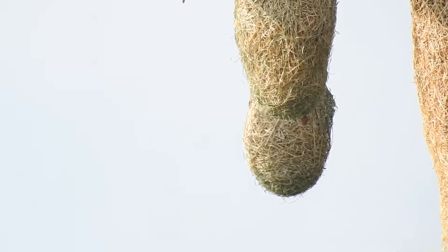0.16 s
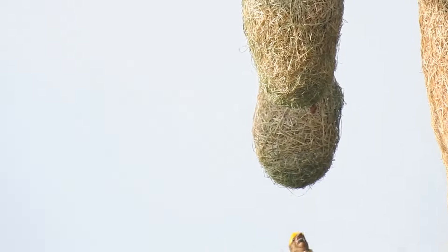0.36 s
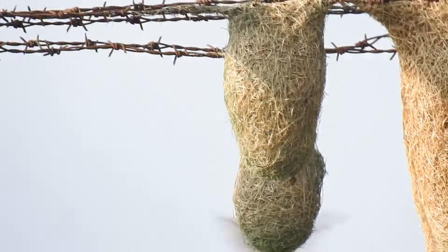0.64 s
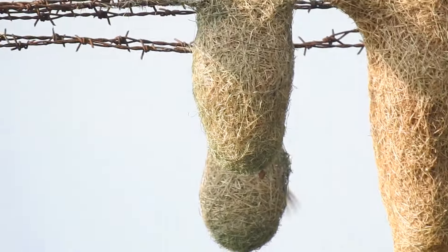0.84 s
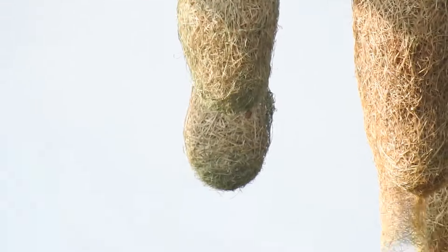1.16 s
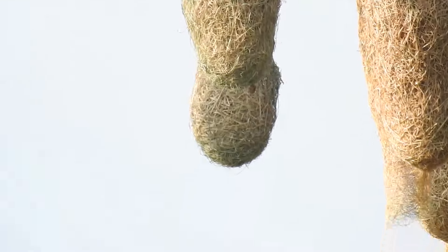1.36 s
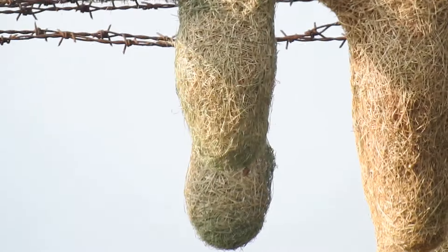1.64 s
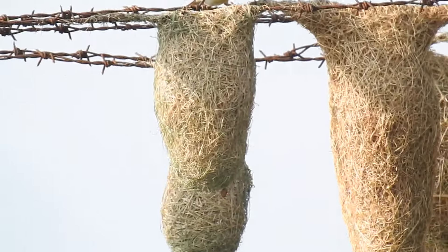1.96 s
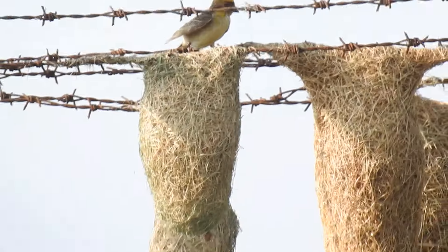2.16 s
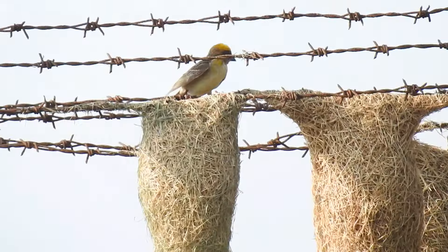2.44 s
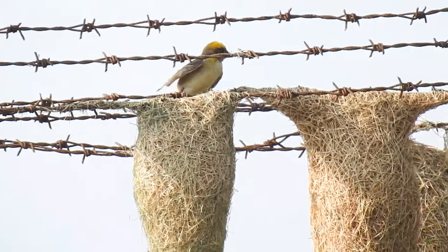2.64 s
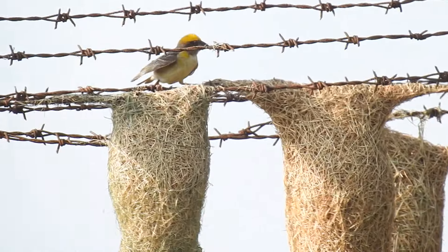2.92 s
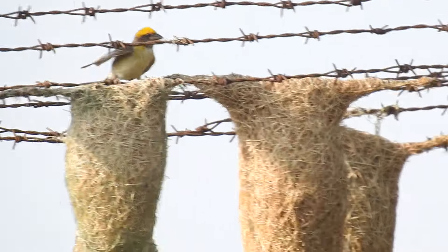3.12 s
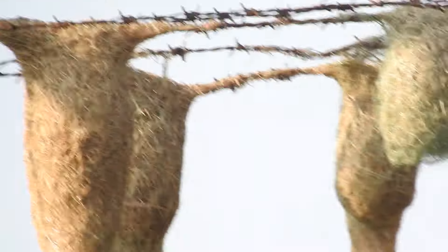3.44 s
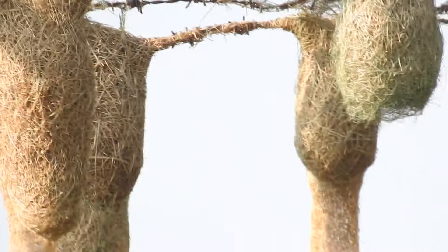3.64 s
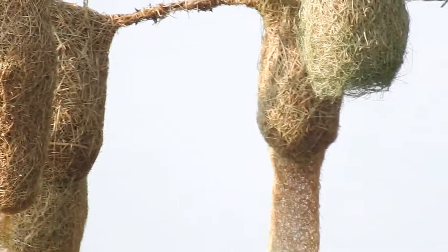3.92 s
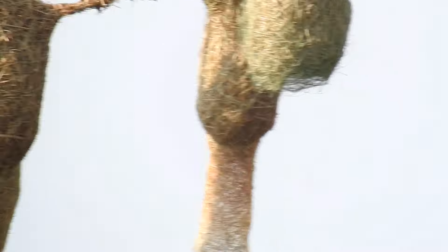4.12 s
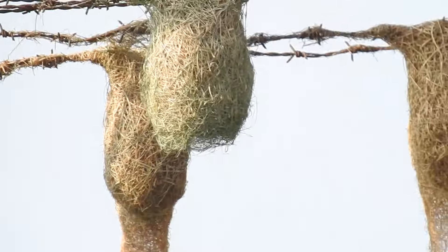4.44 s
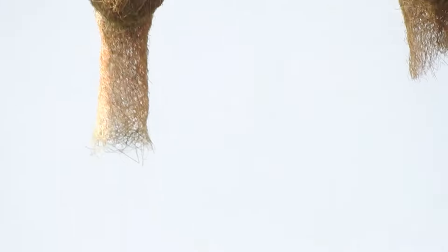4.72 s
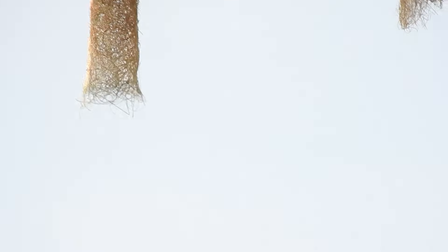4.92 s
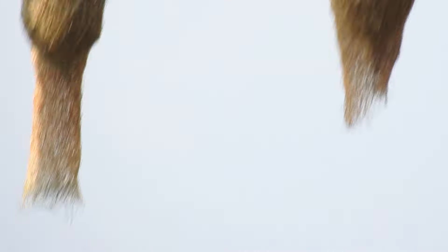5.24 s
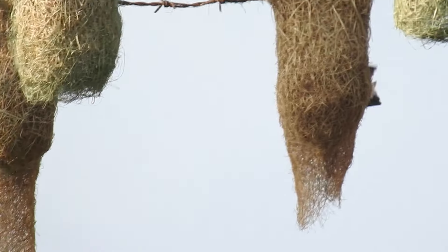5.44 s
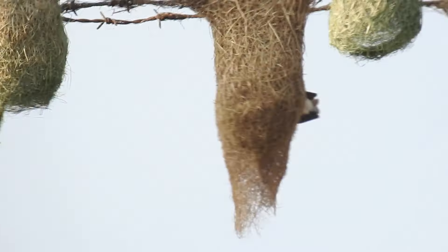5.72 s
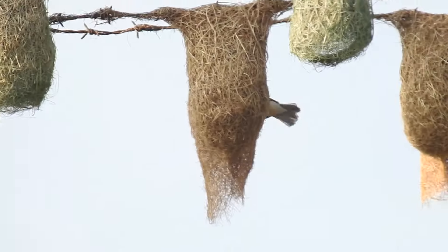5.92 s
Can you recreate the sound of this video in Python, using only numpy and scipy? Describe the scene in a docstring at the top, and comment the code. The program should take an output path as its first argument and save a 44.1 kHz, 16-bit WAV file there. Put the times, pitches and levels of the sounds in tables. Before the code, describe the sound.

Many small birds twitter in open air, near ones sharp and distant ones a shimmering bed. Rapid chattering syllables come about seven a second, with squeaks and piping between them, then louder sliding whistles and a hoarse drawn-out buzz. Low wind buffets knock separately on left and right of the camera's microphone, clustering late. A distant engine hums faintly; a tiny motor whirrs in the last half second.

```python
"""Weaver birds at their hanging nests

A colony in open country, heard through a camera's two microphone ports. Near birds whistle, squeak, rattle
and draw out a long buzzing wheeze, built from hoarse tones, over a far chorus of noise bands and short glides.
A distant engine throbs as ringing pulses. Wind eddies thump on one port or the other as brief pressure swings.
Near the end a small lens motor starts to whirr, made of tones and bands of noise."""
import sys
import numpy as np
from scipy import signal
from scipy.io import wavfile
from scipy.ndimage import uniform_filter1d

SR = 44100
rng = np.random.default_rng(int(sys.argv[2]) if len(sys.argv) > 2 else 0)


def persist_wave(psi):
    """Save psi, clipped to +-1, as 16-bit WAV."""
    counts = np.round(np.clip(psi, -1, 1) * 32767).astype(np.int16)
    wavfile.write(sys.argv[1], SR, np.atleast_2d(counts).T)


N = 268083

# loudness of the far birds over time, before each layer's own offset: time_s, level_db
CHORUS_LEVEL = [(0.0, -45), (0.59, -41.5), (1.24, -44.5), (3.93, -45), (4.98, -46), (6.08, -43.5)]
# how the far birds' sound is spread over pitch, relative: pitch_hz, level_db (per Hz)
CHORUS_SPECTRUM = [(1000, -20), (1700, -9.5), (2250, 1), (2710, -0.5), (3460, 2), (3960, 3), (4630, 6.5),
                   (5610, 3), (6850, 6), (10000, -45), (13000, -34), (22000, -120)]


def amp(db):
    """Turn decibels into a multiplying gain."""
    return 10 ** (np.asarray(db) / 20)


def rms_one(x):
    """Scale a sound to an rms (average strength) of 1."""
    return x / np.sqrt(np.mean(x ** 2) + 1e-20)


def in_time(rows):
    """Read each column of a time table at every sample, with straight lines between rows."""
    time_s, *columns = np.transpose(rows)
    return [np.interp(np.arange(N) / SR, time_s, column) for column in columns]


def at_hz(points, hz):
    """Read a spectrum table at a frequency, on a log-frequency axis."""
    table_hz, values = np.array(points).T
    return np.interp(np.log(hz), np.log(table_hz), values)


def drift(rate_hz, size=N):
    """Random wandering of rms 1: noise passed twice through a one-pole low-pass."""
    r = np.exp(-2 * np.pi * rate_hz / SR)
    noise = rng.standard_normal(size + 4000)
    return rms_one(signal.lfilter([1], [1, -2 * r, r * r], noise)[4000:])  # drop the filter's start-up


def band(x, low_hz, high_hz):
    """Keep mainly the frequencies between two limits, with a Butterworth band-pass."""
    return signal.sosfilt(signal.butter(2, [low_hz, high_hz], "band", fs=SR, output="sos"), x)


def add(out, sound, start_s, edge_s):
    """Mix in one call with soft edges, at random a little louder on one side."""
    i = int(np.clip(start_s * SR, 0, N - 1))
    t = np.arange(len(sound)) / SR
    to_nearest_end = np.minimum(t, t[::-1])
    soft = np.sin(np.pi / 2 * np.clip(to_nearest_end / edge_s, 0, 1)) ** 2
    sides = amp(rng.normal(-0.6, 1) * np.array([[.5], [-.5]]))
    out[:, i:i + len(sound)] += (sound * soft * sides)[:, :N - i]


def span(rows, edge_s):
    """Read one call's table sample by sample, held on for half an edge at both ends."""
    time_s, *columns = np.transpose(rows)
    t = np.arange(max(time_s[0] - edge_s / 2, 0), time_s[-1] + edge_s / 2, 1 / SR)
    return t[0], [np.interp(t, time_s, column) for column in columns]


def hoarse(phase, share, spread_hz):
    """A tone of which a share of the power is smeared into noise around it."""
    size = len(phase)
    smear = drift(spread_hz, size=size) * np.sin(phase) + drift(spread_hz, size=size) * np.cos(phase)
    return np.sqrt(1 - share) * np.sin(phase) + np.sqrt(share / 2) * smear


def whistle(hz, level_db, flutter_db, husk, octave_db):
    """A husky, fluttering near sine from the syrinx (voice organ); its octave is strongest near 4300 Hz."""
    size = len(hz)
    phase = 2 * np.pi * np.cumsum(hz * (1 + 0.0061 * drift(142, size=size))) / SR
    share = np.clip(husk * hz / 4000, 0, .8)  # higher notes are huskier
    octave = amp(octave_db - np.abs(hz - 4300) / 100) * np.sin(2 * phase)
    return amp(level_db + flutter_db * drift(46, size=size)) * (hoarse(phase, share, 310) + octave)


def rattle(hz, level_db, per_s, hoarse_hz):
    """A run of chips that each fall in pitch; a higher voice is hoarser."""
    count = np.cumsum(per_s * amp(1.0 * drift(40, size=len(hz)))) / SR + rng.random()
    chip, within = count.astype(int), count % 1  # which chip, and how far through it
    strength, offset = rng.normal(0, 1, (2, chip.max() + 1))
    rough = np.clip((hz - hoarse_hz) / 3000, .45, .75)
    fall = .25 * (1.3 - rough) * (.5 - within)
    phase = 2 * np.pi * np.cumsum(hz * (1 + fall + .03 * offset[chip])) / SR
    gate = np.sin(np.pi * within) ** 2 + .08 + .7 * rough ** 2  # rough voices keep sounding between chips
    return amp(level_db) * rms_one(hoarse(phase, rough, 520) * gate * amp(1.8 * strength[chip]))


def add_rattle(out, begin_s, end_s, centre_hz, level_db, fade_db):
    """Two voices of the syrinx rattle together, the second higher, faster and weaker."""
    rows = [(begin_s, centre_hz, level_db + fade_db / 2), (end_s, centre_hz, level_db - fade_db / 2)]
    start, (hz, db) = span(rows, .016)
    add(out, rattle(hz, db, per_s=78, hoarse_hz=2480), start, .016)
    add(out, rattle(1.17 * hz, db - 4.0, per_s=86, hoarse_hz=2920), start, .016)


def add_whistle(out, rows):
    """One whistled note follows its table of time, pitch and level."""
    start, (hz, db) = span(rows, 0.015)
    add(out, whistle(hz, db - 1.5, flutter_db=2.5, husk=.14, octave_db=-28), start, .008)


def banded_noise(spectrum, patchy_db, patch_hz):
    """Stereo noise in third-octave bands, each with its own level, flicker and left-right likeness; rms 1."""
    # how alike the two ports sound, 1 meaning the same: pitch_hz, likeness (0 to 1)
    likeness = [(300, 1), (600, 0.97), (2500, 0.72), (5000, 0.43), (8000, 0.017), (12000, .05)]
    low_end, high_end = spectrum[0][0], spectrum[-1][0]
    edges = np.geomspace(low_end, high_end, round(3 * np.log2(high_end / low_end)))
    white = rng.standard_normal((2, 2, N))
    out = 0
    for k, (low, high) in enumerate(zip(edges, edges[1:])):
        mid, side = band(white[k % 2], low, high)
        hz = np.sqrt(low * high)
        alike = np.clip(at_hz(likeness, hz), 0, 1)
        # far sources flicker, the hiss of each port does not
        gain = amp(at_hz(spectrum, hz) + patchy_db * alike * drift(patch_hz))
        out = out + gain * (np.sqrt(1 + alike) * mid + np.sqrt(1 - alike) * side * [[1], [-1]])
    return rms_one(out)


def open_air():
    """Quiet background air: noise that flickers slowly in each band."""
    # spread of the air sound over pitch, relative: pitch_hz, level_db (per Hz)
    air_spectrum = [(200, 3), (300, 0.5), (600, 1), (800, -7.5), (1050, -2), (1700, -13), (4000, -23),
                    (9000, -36.5), (12000, -25.5), (16000, -39)]
    return amp(-47.5) * banded_noise(air_spectrum, patchy_db=3.2, patch_hz=8)


def engine():
    """Firing pulses of a far engine ring in its exhaust pipe, with some flow noise."""
    fires_per_s, pipe_hz = 28.8, 474.5
    turns = np.cumsum(fires_per_s * (1 + .012 * drift(2.5))) / SR
    fires = np.diff(np.floor(turns), prepend=0)  # 1 at each firing, else 0
    puffs = fires * amp(2.0 * rng.standard_normal(N)) + .01 * rng.standard_normal((2, N))
    return amp(-50.5) * rms_one(band(puffs, pipe_hz - 60, pipe_hz + 60))


def chorus_blur():
    """Far birds too many to tell apart: flickering noise shaped like their voices."""
    return amp(in_time(CHORUS_LEVEL)[0]) * banded_noise(CHORUS_SPECTRUM, patchy_db=6.0, patch_hz=30)


def far_notes():
    """Short glides of many distant birds, at random times and pitches."""
    notes_per_s = 160
    out = np.zeros((2, N))
    for when, pitch, length, slope, size in rng.random((round(notes_per_s * N / SR), 5)):
        hz, t = 2100 * 3.8 ** pitch, np.arange(0, 0.012 + 0.085 * length, 1 / SR)
        glide = hz * (1 + 0.16 * (slope - .6) * t / t[-1])
        # pitches are spread evenly in octaves, so higher notes must each carry more
        level_db = at_hz(CHORUS_SPECTRUM, hz) + 10 * np.log10(hz) + 7.0 * size
        note = whistle(glide, level_db, flutter_db=-2.5, husk=0.055, octave_db=-49)
        add(out, note, when * N / SR, t[-1] / 3)
    return amp(in_time(CHORUS_LEVEL)[0] - 8) * rms_one(out)


def wind():
    """Lumpy rumble, separate in each port, and eddies as a swing or two of pressure."""
    # rumble between thumps, before a 10 dB lift: time_s, level_db
    rumble_level = [(0.0, -45), (0.52, -43), (0.85, -47), (4.42, -46), (5.43, -36), (6.08, -47.5)]
    # spread of the rumble over pitch, relative: pitch_hz, level_db (per Hz)
    rumble_spectrum = [(12, -53), (20, -59), (40, 3.5), (70, 3.5), (146, 5.5), (219, -17), (330, -28.5),
                       (420, -11), (550, -41), (920, -120)]
    # eddies thumping on a port: time_s, swell_db, width_ms (at half height), port (0 left, 1 right)
    eddies = [(.375, -15.5, 8.6, 1), (.442, -8.5, 8.5, 1), (0.458, -7, 13, 0), (0.482, -7.5, 5.7, 1),
              (.501, -9, 6.5, 0), (.54, -14.5, 9.4, 1), (0.823, -15, 14, 0), (2.469, -16, 5.8, 0),
              (2.677, -2, 11, 1), (2.687, -4.5, 6.4, 0), (2.752, -16, 16, 0), (3.067, -17.5, 12, 0),
              (3.178, -15, 10.5, 0), (3.215, -16.5, 18, 0), (3.456, -7.5, 5.6, 1), (3.464, -2.5, 6.7, 0),
              (3.496, -12, 10, 0), (4.397, -15.5, 16, 0), (4.63, -10, 7.4, 1), (4.65, -12.5, 28, 0),
              (4.728, -9.5, 15.4, 1), (4.961, -11.5, 15.7, 1), (4.985, -17, 5.8, 1), (5.012, -14.5, 20, 1),
              (5.147, -8.5, 20, 1), (5.167, -11, 13, 1), (5.223, -6.5, 12, 1), (5.236, -7.5, 16.5, 0),
              (5.301, -15, 15.6, 0), (5.347, -6, 10.3, 0), (5.381, -8.5, 21, 1), (5.407, -6.5, 7, 1),
              (5.445, -13, 7, 1), (5.468, -14, 9.5, 1), (5.549, -14, 18, 1), (5.667, -6.5, 6.3, 0),
              (5.682, -13, 24, 1), (5.706, -10.5, 6.8, 0), (5.741, -10, 20, 1), (5.762, -4, 16, 0),
              (5.784, -11, 18, 0), (5.84, -8.5, 16, 1), (5.862, -3.5, 17.7, 0), (5.946, -16, 19.5, 1)]
    edges = np.geomspace(20, 420, 9)
    rumble = 0
    for low, high in zip(edges, edges[1:]):
        gain = amp(at_hz(rumble_spectrum, np.sqrt(low * high)))
        rumble = rumble + gain * band(rng.standard_normal((2, N)), low, high)
    lumps = amp([3.7 * drift(4.4), 2.25 * drift(9.3)])
    out = amp(in_time(rumble_level)[0] + 10.0) * rms_one(rumble * lumps)

    t = np.arange(-.05, .05, 1 / SR)
    noise_burst = rms_one(band(rng.standard_normal(len(t)), 400, 1600)) * .5 ** ((t / 0.0033) ** 2)
    for (time_s, swell_db, width_ms, port), turn in zip(eddies, rng.normal(0, 1, len(eddies))):
        hz = 143.7 + 1.87 * swell_db - 1.75 * width_ms  # strong and narrow eddies swing faster
        phase = 2 * np.pi * hz * t + turn * (1 - amp(swell_db))
        steep = .5 * amp(swell_db)  # strong eddies rise steeply and fall slowly
        swell = amp(swell_db) * .5 ** ((2000 * t / width_ms) ** 2)
        swing = swell * np.sin(phase + steep * np.sin(phase))
        i = round(time_s * SR) - len(t) // 2
        # at the strongest thumps the overloaded input also gives a short noise burst
        overload_burst = amp(-24.5 + 3.7 * swell_db) * noise_burst
        out[round(port), i:i + len(t)] += swing - swing.mean() + overload_burst
    return out


def motor():
    """A lens motor: whine, throbbing gear noise and a high whirr pulsed by the shaft."""
    # course of the motor: time_s, tone_hz, tone_db, gear_noise_db, whirr_db
    course = [(5.62, 1130, -61, -65, -82), (5.65, 1102, -43, -53, -66), (5.72, 1064, -58, -41, -58),
              (5.85, 1045, -44, -48.5, -61), (5.862, 951, -48.5, -48.5, -60), (6.08, 929, -44.5, -47, -60)]
    # gear tones heard once the motor has settled to its low speed: pitch_hz, level_db
    gear_tones = [(1205, -54), (2540, -58)]
    hz, tone_db, gear_db, whirr_db = in_time(course)
    t = np.arange(N) / SR
    phase = 2 * np.pi * np.cumsum(hz) / SR
    tone = amp(tone_db + 3.4 * drift(32)) * np.sqrt(2) * hoarse(phase, 0.23, 30)
    mesh = sum(amp(db + 3.5 * drift(9.9)) * np.sin(2 * np.pi * gear_hz * t) for gear_hz, db in gear_tones)
    mesh *= hz < 1000
    gear_noise = rms_one(band(band(rng.standard_normal(N), 450, 1200), 448, 1230))
    gear = amp(gear_db + 2.0 * np.sin(2 * np.pi * 24 * t)) * gear_noise
    whirr_noise = rms_one(band(rng.standard_normal((2, N)), 9050, 9500))
    whirr = amp(whirr_db) * (1 + .5 * np.sin(2 * np.pi * 44 * t)) * whirr_noise
    return (tone + mesh + gear + whirr) * (t > course[0][0])


def echoes(x):
    """A few dull reflections off ground and nests, at slightly different times on each side."""
    # delay_s (varied at random on each side), level_db
    reflections = [(.011, -13), (.023, -15), (.041, -17), (.067, -20), (.098, -23)]
    dull = signal.lfilter([.6], [1, -.4], x.mean(0))
    out = np.zeros((2, N))
    for delay_s, db in reflections:
        for side in out:
            lag = int(delay_s * SR * rng.uniform(0.75, 1.2))
            side[lag:] += amp(db) * dull[:-lag]
    return out


def ticks():
    """Bill or wire ticks: single-sample clicks through a high band-pass."""
    # time_s, click_db (before a 2 dB cut and the band-pass)
    tick_times = [(0.7097, -14), (0.7391, -28), (2.1115, -25), (2.2307, -27), (2.7137, -11), (3.1417, -31),
                  (4.4859, -43), (4.5036, -23), (4.965, -25)]
    clicks = np.zeros(N) + 1e-18
    for time_s, db in tick_times:
        clicks[round(time_s * SR)] = amp(db - 2.0)
    return band(clicks, 5500, 9300)


def squeaks():
    """Nasal squeaks: hoarse harmonics of one low note, shaped by the throat."""
    # pitch of the low note through one squeak: share_of_length, pitch_hz
    squeak_pitch = [(0, 526.5), (.65, 588), (1, 566)]
    # how strongly the throat passes each pitch, relative: pitch_hz, level_db
    throat = [(2300, -15.5), (2900, -11.5), (3450, 0), (4050, -10), (4650, 1), (5300, -13), (6000, -33)]
    # start_s, length_s, level_db (rms)
    squeak_times = [(1.101, 0.045, -39.5), (1.299, 0.027, -38.5), (1.495, 0.05, -38), (1.679, 0.048, -36),
                    (1.905, 0.0486, -39), (2.135, 0.039, -37.5), (2.435, 0.037, -37)]
    out = np.zeros((2, N))
    for start_s, length_s, level_db in squeak_times:
        start, (f0,) = span([(start_s + share * length_s, hz) for share, hz in squeak_pitch], 0.015)
        size = len(f0)
        phase = 2 * np.pi * np.cumsum(f0 * (1 + 0.0053 * drift(220, size=size))) / SR
        stack = 0
        for k in range(4, 11):
            gain = amp(at_hz(throat, k * f0) + 2.4 * drift(50, size=size))
            stack = stack + gain * hoarse(k * phase + k * k, 0.45, 180)
        add(out, amp(level_db) * rms_one(stack), start, .015)
    return out


def high_rattles():
    """Thin rattles of a higher bird, swelling slightly as they go."""
    # start_s, length_s, centre_hz, level_db (rms of the first voice)
    rattle_times = [(0.152, 0.089, 6080, -52), (0.302, 0.11, 6650, -51), (0.497, 0.059, 6450, -51),
                    (0.805, 0.11, 6400, -50), (1.694, 0.067, 6660, -48), (1.871, 0.067, 7000, -50),
                    (2.0, .1, 7160, -49), (2.099, 0.17, 7000, -51), (2.27, 0.12, 7560, -56),
                    (2.402, 0.13, 7260, -54), (0.624, 0.13, 7000, -56), (0.998, .1, 7340, -53.5),
                    (2.636, 0.031, 6430, -43)]
    out = np.zeros((2, N))
    for start_s, length_s, centre_hz, level_db in rattle_times:
        add_rattle(out, start_s, start_s + length_s, centre_hz, level_db, fade_db=-1.5)
    return out


def zigzag_calls():
    """Whistled calls whose pitch zigzags up and down with rounded turns."""
    # shape of one call: share_of_length, pitch_hz, level_db (relative)
    zigzag_shape = [(0, 5000, -8), (.15, 6400, -2), (.36, 5250, 0), (.52, 5200, 0), (.65, 6000, -2),
                    (.8, 5200, -3), (1, 4200, -6)]
    # start_s, length_s, level_db (added to the shape)
    zigzag_times = [(0.651, 0.082, -35), (1.613, 0.069, -30.5), (3.205, 0.094, -32.5), (3.944, 0.071, -33),
                    (4.755, .075, -30.5), (5.592, 0.079, -30.5)]
    out = np.zeros((2, N))
    for start_s, length_s, level_db in zigzag_times:
        rows = [(start_s + share * length_s, hz, db) for share, hz, db in zigzag_shape]
        start, (hz, db) = span(rows, 0.008)
        hz = uniform_filter1d(hz, size=150)  # rounds the turns
        call = whistle(hz, db + level_db, flutter_db=2.0, husk=.12, octave_db=-40)
        add(out, call, start, .006)
    return out


def whistled_notes():
    """Near-sine whistles: songs, straight chirps, two-voiced arches and a farther bird's low piping."""
    # song lines, one list each, before a 1.5 dB cut: time_s, pitch_hz, level_db
    songs = [
        [(1.34, 3250, -36), (1.37, 2384, -46), (1.418, 2110, -41)],
        [(1.428, 2750, -42), (1.45, 3240, -42), (1.5, 3250, -40.5)],
        [(1.565, 3070, -42), (1.61, 3090, -46.5), (1.645, 2280, -41), (1.667, 2270, -44)],
        [(4.37, 3570, -32.5), (4.4, 3270, -31), (4.436, 3240, -34)],
        [(4.79, 3010, -50), (5.0, 2970, -49.5), (5.15, 2890, -54)],
        [(4.14, 4650, -30.5), (4.26, 3970, -28), (4.32, 3820, -24.5)],
        [(4.375, 4350, -29), (4.45, 4170, -30.5), (4.6, 3660, -35), (4.675, 3070, -35)],
        [(4.548, 6410, -33), (4.62, 6410, -26), (4.66, 6060, -39)],
        [(4.68, 6420, -35), (4.82, 6350, -29.5), (4.9, 6240, -31), (5.05, 6440, -28), (5.2, 6200, -43)],
        [(4.62, 6010, -32), (4.7, 5620, -35), (4.78, 5600, -34)],
    ]
    # straight chirps, before the same cut: start_s, length_s, from_hz, to_hz, level_db
    chirps = [(0.964, 0.047, 6440, 6600, -37.5), (0.956, 0.083, 7120, 7000, -43),
              (1.112, 0.046, 7170, 7960, -44), (1.255, .045, 7540, 7000, -37),
              (1.383, 0.028, 7100, 7440, -45), (1.531, 0.081, 7250, 7150, -43),
              (1.657, .035, 7230, 7500, -42), (1.982, 0.022, 7760, 7770, -41),
              (2.067, .045, 5200, 5500, -45), (2.18, 0.024, 5200, 5050, -40),
              (2.353, 0.02, 3600, 3580, -33), (2.37, 0.019, 7930, 6420, -35),
              (2.45, 0.038, 5200, 5650, -39), (2.579, 0.046, 5280, 5630, -41),
              (2.952, .045, 4820, 5570, -42), (3.454, .045, 5240, 5150, -37),
              (4.373, 0.086, 2750, 2360, -51), (4.489, 0.027, 3200, 3090, -37.5),
              (4.562, 0.062, 6900, 6800, -34), (4.742, 0.02, 3035, 3085, -36),
              (5.502, .025, 3370, 2870, -38.5), (5.73, .02, 3090, 2900, -41),
              (5.782, 0.0165, 3610, 3830, -39.5), (5.922, .025, 3390, 3000, -38),
              (5.95, 0.016, 3570, 2880, -38), (5.974, .013, 3660, 3275, -41),
              (6.01, 0.0091, 3660, 3430, -42)]
    # faint level notes of a farther bird at 2250 Hz, before the same cut: start_s, level_db
    far_piping = [(.62, -49), (.8, -52), (.95, -48), (1.105, -55), (1.31, -49), (1.5, -53), (1.561, -53),
                  (1.72, -48), (1.81, -52)]
    # shape of one arched call: share_of_length, pitch_hz, level_db (relative)
    arch_shape = [(0, 5500, -18), (0.408, 6050, -4.5), (1.005, 5300, -19)]
    # arched calls, before the same cut: start_s, length_s, level_db (added to the shape)
    arch_times = [(.42, 0.042, -20.5), (6.008, 0.035, -25.5), (6.062, .016, -30)]
    notes = list(songs)
    for start_s, length_s, from_hz, to_hz, db in chirps:
        notes.append([(start_s, from_hz, db + .25), (start_s + length_s, to_hz, db - .25)])
    for start_s, db in far_piping:
        notes.append([(start_s, 2250, db), (start_s + 0.034, 2250, db)])
    for start_s, length_s, level_db in arch_times:
        lower = [(start_s + share * length_s, hz, db + level_db) for share, hz, db in arch_shape]
        upper = [(start_s + share * length_s, hz + 556, db / 2 + level_db - 10.5)
                 for share, hz, db in arch_shape]
        notes += [lower, upper]
    out = np.zeros((2, N))
    for note in notes:
        add_whistle(out, note)
    return out


def wheeze():
    """A fast buzz splits two hoarse, slowly sinking tones into stacks of fine lines that each waver."""
    # course of the wheeze: time_s, buzz_hz (pulses per second), upper_tone_hz, level_db
    wheeze_course = [(4.72, 300, 6320, -52), (4.8, 314, 6060, -31.5), (5.0, 380, 6020, -36),
                     (5.2, 390, 5480, -33), (5.45, 304, 5420, -35.5), (5.62, 280, 5570, -37.5),
                     (5.78, 260, 5430, -40.5), (5.82, 200, 5400, -57)]
    start, (per_s, upper_hz, level_db) = span(wheeze_course, .01)
    size, lines, out = len(per_s), 0, np.zeros((2, N))
    buzz = per_s * (1 + .04 * drift(30, size=size))
    for hz, db in ((upper_hz, 0), (.78 * upper_hz, -5.5)):
        hz = hz * (1 + .005 * drift(20, size=size))
        for step in range(-3, 4):
            phase = 2 * np.pi * (np.cumsum(hz + step * buzz) / SR + rng.random())
            line_db = db - 4.0 * abs(step) + 3.0 * drift(22, size=size)  # weaker away from each tone
            lines = lines + amp(line_db) * hoarse(phase, .66, 100)
    add(out, amp(level_db) * rms_one(lines), start, .01)
    return out * amp([[-.8], [.4]])  # slightly to the right


def chatter():
    """Chatter syllables: a falling whistled pip, then a low and a high rattle together."""
    # start_s, length_s, pip_db (before a 1.5 dB cut), low_db (rms), high_hz, high_db (rms)
    syllables = [(0, 0.072, -52, -48.5, 4910, -43), (0.142, .11, -44.5, -50, 5020, -43),
                 (.29, .12, -39, -46, 4730, -41.5), (0.442, 0.11, -35.5, -45.5, 5130, -38),
                 (0.591, 0.12, -31.5, -43.5, 5260, -39.5), (0.748, .11, -34.5, -43, 4710, -42),
                 (0.909, 0.088, -37, -45, 4830, -40.5), (1.181, 0.11, -60, -53, 4780, -45),
                 (2.179, 0.083, -57, -56, 5390, -42), (2.304, 0.15, -57, -43.5, 5520, -46.5),
                 (2.421, .1, -47, -45.5, 5470, -46.5), (2.504, 0.084, -58, -52, 5410, -41),
                 (2.652, 0.12, -34, -46.5, 5360, -39), (2.822, 0.12, -36.5, -48, 5220, -44.5),
                 (2.92, 0.071, -42, -46, 5050, -55), (3.0, 0.14, -35, -43.5, 5150, -40.5),
                 (3.191, .115, -35.5, -43, 5220, -39.5), (3.334, 0.17, -43, -41, 5460, -43),
                 (3.473, 0.11, -41, -37.5, 5200, -48), (3.616, 0.13, -40, -38, 5120, -42.5),
                 (3.764, 0.12, -34, -37, 5150, -46), (3.878, 0.18, -38, -41, 5500, -46.5),
                 (4.102, 0.07, -35.5, -39.5, 5200, -49), (4.261, .11, -50, -43, 4300, -47),
                 (5.96, 0.064, -50, -48, 5200, -55)]
    pip_s, pip_hz, pip_fall_hz = 0.0186, 3626, 151
    out = np.zeros((2, N))
    for start_s, length_s, pip_db, low_db, high_hz, high_db in syllables:
        end_s = start_s + length_s
        add_whistle(out, [(start_s, pip_hz, pip_db), (start_s + pip_s, pip_hz - pip_fall_hz, pip_db)])
        add_rattle(out, start_s + .02, end_s, 3414, low_db, fade_db=4.5)
        add_rattle(out, start_s + .026, end_s, high_hz, high_db, fade_db=-1.5)
    return out


def separate_calls():
    """All the separately placed bird calls and ticks, with the faint low piping of a farther bird."""
    return (ticks() + squeaks() + high_rattles() + zigzag_calls()
            + whistled_notes() + wheeze() + chatter())


def scene():
    """All sources at the two ports; the separate calls and the far notes also send echoes."""
    birds = separate_calls() + far_notes()
    return open_air() + engine() + chorus_blur() + wind() + motor() + echoes(birds) + birds


def record(dry):
    """The preamplifier flattens peaks above its overload level, and a steep filter cuts the top."""
    overload, cutoff_hz = .58, 15740
    flat = dry / (1 + np.abs(dry / overload) ** 40) ** (1 / 40)
    return signal.sosfilt(signal.ellip(12, .3, 80, cutoff_hz, fs=SR, output="sos"), flat)


dry = scene()
out = record(dry)
persist_wave(out)
```